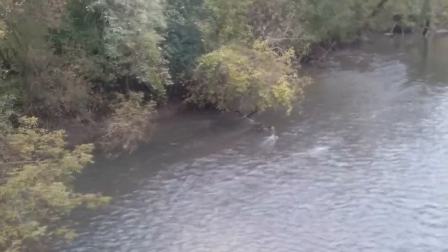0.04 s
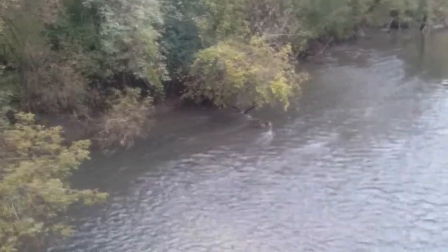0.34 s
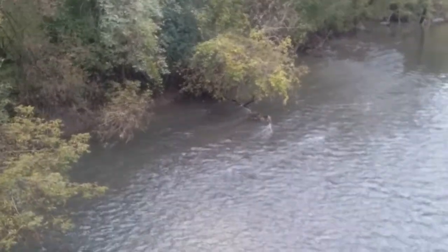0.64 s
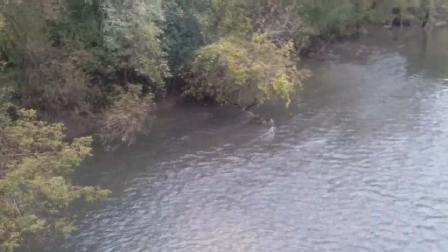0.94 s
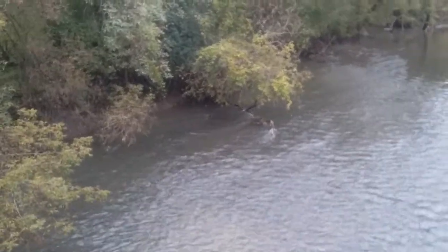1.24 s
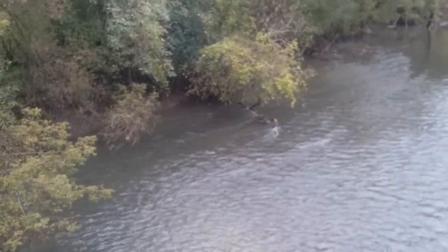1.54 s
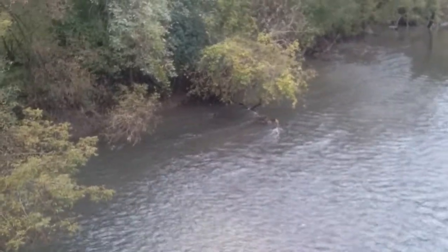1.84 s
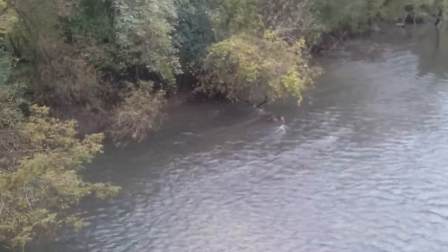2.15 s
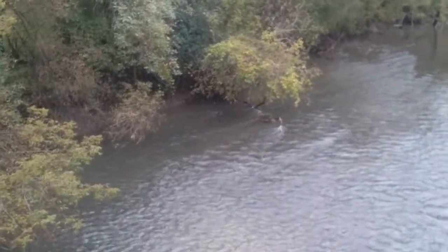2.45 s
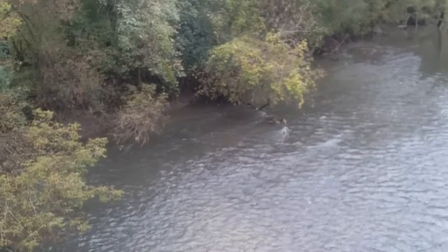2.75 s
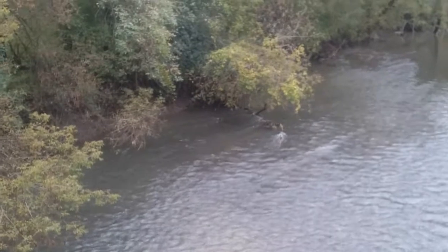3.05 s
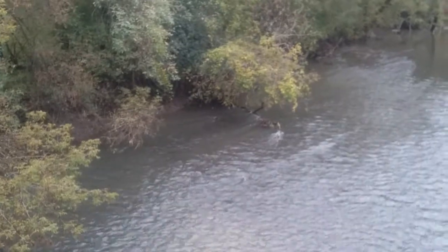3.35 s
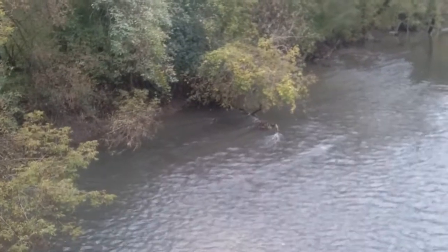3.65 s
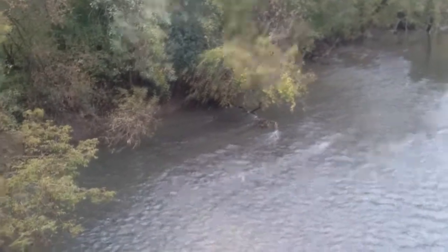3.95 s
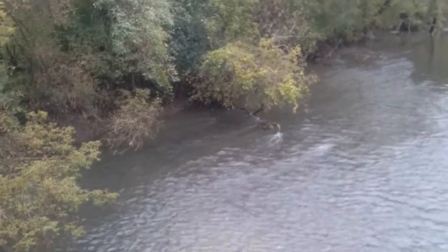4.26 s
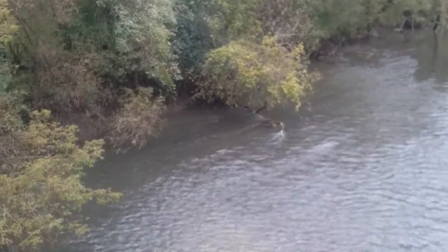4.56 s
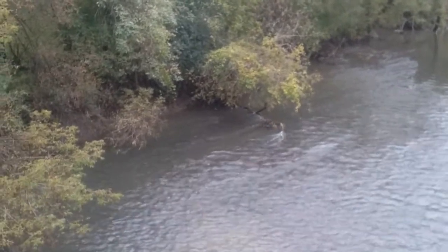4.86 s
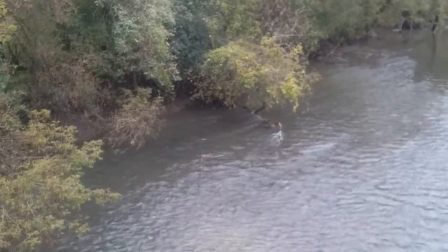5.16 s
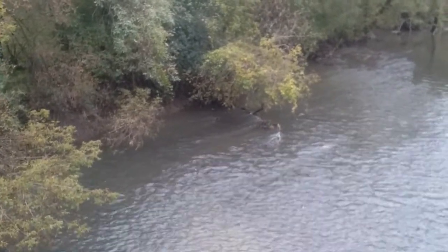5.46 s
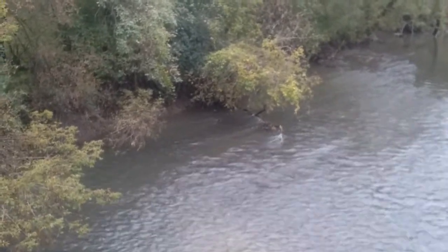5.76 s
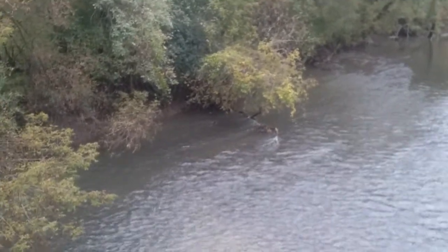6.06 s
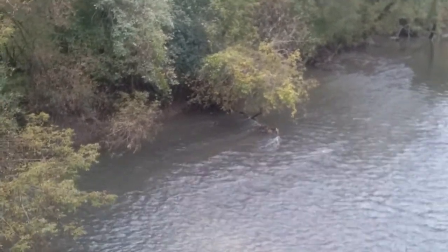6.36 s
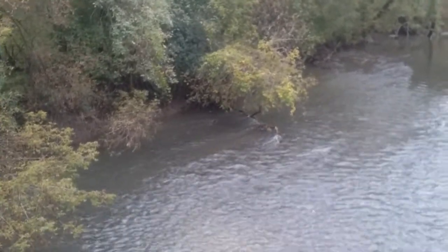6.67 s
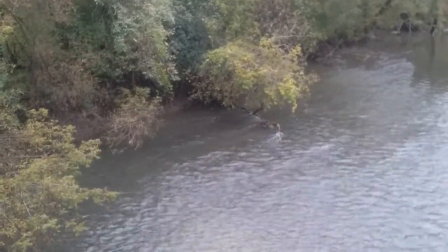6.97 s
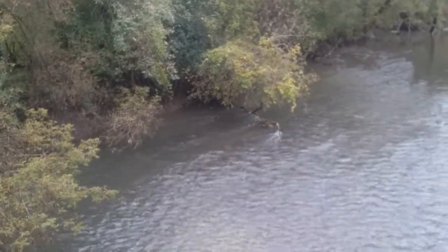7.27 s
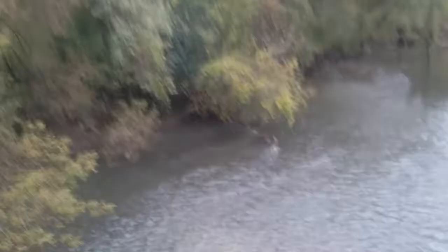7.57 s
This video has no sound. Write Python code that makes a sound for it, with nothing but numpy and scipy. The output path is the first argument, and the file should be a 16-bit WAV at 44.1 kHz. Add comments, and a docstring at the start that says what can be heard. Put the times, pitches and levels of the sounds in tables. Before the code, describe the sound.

Soft rushing water and low outdoor rumble run under close handling thumps, ending with a finger rub and a sharp button snap.

```python
"""On a wooded bank above a broad river, with the microphone in a hand-held camera.
From the start the water is a quiet, even rush over a low outdoor rumble. Leaves stir, drops fall
and a few bird notes come from far off; close up, the hand shifts and bumps the case now and then.
At the end, right at the microphone, a finger rubs the case, snaps a button and stutters off it."""
import sys
import numpy as np
from scipy import signal
from scipy.fft import rfft, irfft, next_fast_len
from scipy.io import wavfile
from scipy.ndimage import uniform_filter1d, map_coordinates

SR = 44100
rng = np.random.default_rng(int(sys.argv[2]) if len(sys.argv) > 2 else 0)


def store_wav(level_fs):
    """Save 16-bit WAV to argv[1]."""
    pcm = np.round(np.clip(np.atleast_2d(level_fs), -1, 1) * 32767)
    wavfile.write(sys.argv[1], SR, pcm.T.astype(np.int16))


N = 344421

# The strength of the river as heard from the bank. Each row: time in seconds, strength in dB.
RIVER_STRENGTH = [(0.0, -53), (0.17, -52.5), (0.33, -53.5), (0.52, -51.5), (0.72, -49), (1.2, -52.5),
                  (1.3, -53.5), (1.41, -53.5), (1.53, -52.5), (1.72, -55), (1.9, -53), (2.48, -56),
                  (2.64, -52.5), (2.87, -54.5), (3.52, -54), (3.57, -57), (3.8, -54.5), (4.05, -52),
                  (4.45, -54.5), (4.82, -52.5), (5.15, -54), (5.42, -54), (5.63, -52), (5.88, -52),
                  (6.4, -54), (6.97, -53), (7.5, -54)]


def amp(db):
    """Decibels to gain."""
    return 10 ** (np.asarray(db) / 20)


def unit(x):
    """Scale to rms 1."""
    return x / np.sqrt(np.mean(x ** 2) + 1e-20)


def along(points, hz):
    """Read (Hz, value) points on a log frequency axis."""
    freqs, values = np.transpose(points)
    return np.interp(np.log(hz + 1), np.log(freqs + 1), values)


def curve(rows):
    """Join (seconds, value) rows into one value per sample."""
    return np.interp(np.arange(N) / SR, *np.transpose(rows))


def wobble(per_second):
    """A smooth curve through so many random knots a second."""
    knots = rng.standard_normal(int(N * per_second / SR) + 4)
    return map_coordinates(knots, [np.arange(N) * per_second / SR])


def swell(start, length):
    """A rounded rise and fall, timed in seconds."""
    return np.sin(np.pi * np.clip((np.arange(N) / SR - start) / length, 0, 1))


def add(track, start, sound):
    """Mix a sound into the track from a start in seconds."""
    span = track[round(start * SR):][:len(sound)]
    span += sound[:len(span)]


def filtered(x, response):
    """Filter x by a gain given as a function of Hz."""
    size = next_fast_len(N + SR // 2)
    return irfft(rfft(x, size) * response(np.fft.rfftfreq(size, 1 / SR)), size)[:N]


def coloured(x, spectrum):
    """Shape x by (Hz, dB) points, at rms 1."""
    return unit(filtered(x, lambda hz: amp(along(spectrum, hz))))


def patchy(depth_db, size=512):
    """White noise whose strength drifts in patches of time and frequency."""
    cells = signal.stft(rng.standard_normal(N), nperseg=size)[2]
    drift = uniform_filter1d(rng.standard_normal(cells.shape), size=5, axis=0)
    drift = uniform_filter1d(drift, size=14, axis=1)
    return signal.istft(cells * amp(depth_db * unit(drift)), nperseg=size)[1][:N]


def far_tones(rows, width_hz):
    """Short pitched sounds, blurred by distance into narrow bands of noise."""
    out = np.zeros(N)
    for start, length, pitch, db in rows:
        band = filtered(rng.standard_normal(N), lambda hz: np.exp(-((hz - pitch) / width_hz) ** 2))
        out += amp(db) * swell(start, length) * unit(band)
    return out


def blow(spectrum, soft_hz, low_hz=0, size=8192):
    """A pulse of peak 1: a soft touch dulls it above soft_hz, a light one thins it below low_hz."""
    hz = np.fft.rfftfreq(size, 1 / SR)
    touch = (1 + (hz / soft_hz) ** 2) * (1 + (low_hz / (hz + 1)) ** 2)
    cepstrum = irfft(np.log(amp(along(spectrum, hz)) / touch))
    causal_fold = np.r_[1, np.full(size // 2 - 1, 2), np.zeros(size // 2)]
    pulse = irfft(np.exp(rfft(cepstrum * causal_fold)))
    return pulse / np.abs(pulse).max()


def contacts(rows, body_spectrum):
    """Each contact pushes the case and adds a bright plastic tick."""
    # The tick. Each row: frequency in Hz, level in dB.
    tick_spectrum = [(200, -53), (1000, -22), (4500, 5), (5700, -11), (7000, 3.5), (8000, 1), (9500, 3),
                     (12000, -5.5), (16000, -10)]
    out, tick = np.zeros(N), blow(tick_spectrum, soft_hz=np.inf)
    for start, body_db, tick_db, *touch in rows:
        add(out, start, amp(body_db) * blow(body_spectrum, *touch))
        add(out, start - 0.0003, -amp(tick_db) * tick)  # the surface is touched before the case gives
    return out


def river():
    """Below the bank, countless ripples merge into one rush that surges a little."""
    # The rush. Each row: frequency in Hz, level in dB.
    rush_spectrum = [(100, -24), (260, -6.5), (420, 1.5), (500, -3.5), (800, -1), (1200, -6.5), (2300, -8),
                     (2800, -12), (3800, -11), (4400, -17), (5100, -28), (7000, -31), (15000, -29.5)]
    # Narrow bands that stand out of it. Each row: centre in Hz, width in Hz, lift in dB.
    bands = [(827, 31, 0.5), (1038, 11, 7), (1425, 66, 5), (1807, 31, 3.5)]

    def band_gain(hz):
        return amp(sum(db / (1 + (2 * (hz - centre) / width) ** 2) for centre, width, db in bands))

    ripples = filtered(patchy(depth_db=0.78), band_gain)
    level_db = curve(RIVER_STRENGTH) + 0.8
    surge_db = 0.79 * wobble(per_second=30) + 0.35 * wobble(per_second=5.4)
    return amp(level_db + surge_db) * coloured(ripples, rush_spectrum)


def lapping(per_second, fade_s):
    """Wavelets slap the bank at random: brief, dull splashes that overlap."""
    # A splash. Each row: frequency in Hz, level in dB.
    splash_spectrum = [(60, -44), (150, -19), (300, 0.5), (800, -1), (1500, -3.5), (3500, -10), (5000, -20),
                       (12000, -49)]
    slaps = rng.random(N) * (rng.random(N) < per_second / SR)
    t = np.arange(SR // 4) / SR
    envelope = signal.fftconvolve(slaps, t / fade_s * np.exp(1 - t / fade_s))[:N]
    splashes = unit(envelope * coloured(rng.standard_normal(N), splash_spectrum))
    return amp(curve(RIVER_STRENGTH) - 5.5) * splashes


def gurgles():
    """The water gives soft, low plops some way off."""
    # Each row: start in seconds, length in seconds, pitch in Hz, level in dB.
    plops = [(2.60, 0.11, 378, -50), (5.34, .06, 524, -53.5)]
    return far_tones(plops, width_hz=130)


def drips():
    """Each drop traps a bubble that rings briefly and rises a little in pitch."""
    # Each row: start in seconds, pitch in Hz, peak in dB.
    drops = [(.756, 1840, -44), (2.217, 3570, -48), (6.087, 526, -36), (6.872, 2260, -49)]
    fade_s, relative_rise_per_s = 0.0016, 2.8
    out, t = np.zeros(N), np.arange(SR // 10) / SR
    envelope = t / fade_s * np.exp(1 - t / fade_s)
    for start, hz, db in drops:
        bubble = np.sin(2 * np.pi * hz * (t + relative_rise_per_s * t ** 2 / 2))
        add(out, start, amp(db) * envelope * bubble)
    return out


def bumps():
    """The hand knocks the case: a thud with a faint tick, then a brief, dense ring of the shell."""
    # Each row: start in seconds, thud peak in dB, bass corner in Hz, softness corner in Hz.
    knocks = [(.237, -31, 90, 450), (.265, -42, 60, 200), (0.609, -26.5, 150, 400), (0.634, -36, 60, 200),
              (.648, -41, 60, 200), (0.782, -37, 140, 400), (.805, -36.5, 110, 300), (1.019, -39, 120, 200),
              (1.915, -37.5, 40, 200), (3.894, -36, 150, 6000), (4.017, -36, 100, 170),
              (4.069, -10.5, 20, 7500), (4.115, -40, 170, 350), (4.571, -40, 120, 200),
              (4.78, -43, 120, 250), (5.472, -40.5, 100, 200), (5.748, -39.5, 110, 170),
              (5.998, -38, 110, 400), (6.056, -39, 130, 300), (6.278, -41, 110, 180), (6.44, -43, 100, 180),
              (6.503, -40.5, 110, 180), (6.569, -42, 110, 180), (6.643, -41.5, 100, 180),
              (7.108, -41, 150, 400), (7.234, -39, 140, 400), (7.387, -43, 150, 400),
              (7.6175, -33, 270, 350), (7.6276, -25.5, 350, 450), (7.634, -21.5, 320, 380),
              (7.6434, -26, 450, 450), (7.654, -30, 330, 380)]
    # The thud. Each row: frequency in Hz, level in dB.
    thud_spectrum = [(25, -40), (42, -21), (62, 1.5), (85, 3), (150, 4), (300, -1), (500, -6), (1150, -6.5),
                     (1600, -16), (2700, -16), (4500, -31.5), (8000, -50), (16000, -66)]
    tick_db, ring_db = -29, -17.5  # relative to the thud
    ring_fade_s, ring_low_hz = 0.02, 350
    rows = [(start, db, db + tick_db, soft_hz, low_hz) for start, db, low_hz, soft_hz in knocks]
    thuds = contacts(rows, thud_spectrum)
    t = np.arange(SR // 10) / SR
    tail = rng.standard_normal(len(t)) * np.exp(-t / ring_fade_s)
    tail = signal.sosfilt(signal.butter(2, ring_low_hz, "highpass", fs=SR, output="sos"), tail)
    ring = signal.fftconvolve(thuds, tail / np.linalg.norm(tail))[:N]
    return thuds + amp(ring_db) * ring


def rubbing():
    """Skin slides next to the microphone, shaking the case and scuffing it in fine grains."""
    # Each row: start in seconds, length in seconds, shudder level in dB, scuff level in dB.
    rubs = [(0.06, 0.18, -52, -60), (0.224, 0.052, -46, -50), (1.853, 0.12, -55, -63),
            (3.99, 0.32, -52.5, -55), (4.064, 0.04, -35.5, -48.5), (5.802, 0.1, -49, -52.5),
            (7.527, 0.22, -39, -48.5), (7.624, 0.034, -25.5, -38.5), (7.645, 0.2, -59.5, -43.5)]
    # The low shudder and the brighter scuff. Each row: frequency in Hz, level in dB.
    shudder_spectrum = [(30, -45), (50, -24), (66, 5), (90, 1.5), (125, 11), (175, -3), (280, -2),
                        (480, -8.5), (900, -19.5), (3000, -59)]
    scuff_spectrum = [(100, 3), (400, 1.5), (1400, 2.5), (3000, -4.5), (4500, -7), (5600, -18.5),
                      (9500, -18.5), (15000, -30)]
    shudder = coloured(rng.standard_normal(N), shudder_spectrum)
    grains = rng.standard_normal(N) * amp(3.1 * wobble(per_second=600))
    scuff = coloured(grains, scuff_spectrum)
    return sum(swell(start, length) ** 2 * (amp(shudder_db) * shudder + amp(scuff_db) * scuff)
               for start, length, shudder_db, scuff_db in rubs)


def sleeve():
    """Soft cloth brushes past the case in one dull sweep."""
    # The cloth. Each row: frequency in Hz, level in dB.
    cloth_spectrum = [(50, -4), (160, 17.5), (300, 3), (600, -2), (1500, 3.5), (3000, -3), (4400, -14),
                      (5400, -20), (8000, -23), (15500, -28)]
    cloth = coloured(rng.standard_normal(N), cloth_spectrum)
    return amp(-43.5) * swell(start=0.593, length=0.081) * cloth


def button():
    """The button squeaks, snaps home and gives a small click; a lone dull tick sounds at the end."""
    # Each row: start in seconds, body peak in dB, tick peak in dB, softness corner in Hz.
    clicks = [(7.6669, -23, -24, 3000), (7.6687, -18.5, -24, 3000), (7.671, 1.5, -19, 12000),
              (7.6897, -32, -34, 4000), (7.8063, -24, -55, 1400)]
    # The squeak and the snap. Each row: frequency in Hz, level in dB.
    squeak_spectrum = [(500, -11), (4500, -13), (6500, -30), (8000, -8), (9600, 1), (11000, -10),
                       (13000, -22), (15000, -32)]
    snap_spectrum = [(100, -60), (300, -12), (600, 1), (1400, -5.5), (2300, -4), (3300, 1), (4800, -1),
                     (5400, -13.5), (6500, -4.5), (7800, -17), (15000, -25)]
    friction = coloured(rng.standard_normal(N), squeak_spectrum)
    squeak = amp(-18.5) * swell(start=7.6657, length=0.0073) ** 2 * friction
    return squeak + contacts(clicks, snap_spectrum)


def finger_stutter():
    """The finger sticks and slips as it leaves the case: crisp knocks that spread out and grow."""
    # Each row: start in seconds, thud peak in dB, tick peak in dB.
    slips = [(7.7005, -24.5, -28), (7.7137, -21, -24), (7.7289, -21.5, -20.5), (7.7448, -20, -16),
             (7.7639, -18.5, -25)]
    # The thud of a slip. Each row: frequency in Hz, level in dB.
    slip_spectrum = [(30, -42), (80, -7), (130, 4), (220, 3), (330, 1), (500, -6.5), (950, -4), (1700, -17),
                     (2800, -18.5), (4500, -20), (8000, -47), (16000, -66)]
    soft_hz = 6500
    return contacts([(*slip, soft_hz) for slip in slips], slip_spectrum)


def leaves():
    """Leaves on the bank stir in soft swells, with a thin sizzle on top."""
    # Each row: start in seconds, length in seconds, level in dB.
    stirs = [(0.03, 0.19, -54), (1.26, 0.082, -53), (1.43, 0.25, -56.5), (1.858, 0.088, -54.5),
             (2.573, .14, -57.5), (4.76, 0.094, -57.5), (5.538, 0.13, -57.5), (5.72, 0.32, -59)]
    # The rustle. Each row: frequency in Hz, level in dB.
    leaf_spectrum = [(150, -9), (600, 6), (1500, 4), (3000, -3), (4400, -5.5), (5400, -17), (8000, -22),
                     (13000, -19), (15500, -21)]
    rustle = coloured(patchy(depth_db=3.5), leaf_spectrum)
    return rustle * sum(amp(db) * swell(start, length) for start, length, db in stirs)


def birds():
    """A few faint, high notes reach the microphone from far off."""
    # Each row: start in seconds, length in seconds, pitch in Hz, level in dB.
    notes = [(1.26, .28, 6150, -81), (1.38, 0.34, 3400, -68), (5.65, .11, 6200, -77.5),
             (5.67, 0.14, 3400, -62), (5.84, 0.23, 3060, -72)]
    return far_tones(notes, width_hz=180)


def rumble():
    """The low, uneven murmur of open air swells and sinks with the rush."""
    # The murmur. Each row: frequency in Hz, level in dB.
    air_spectrum = [(20, -32), (33, -29), (45, -17), (56, -11), (67, 2), (85, -2.5), (115, 0.5), (170, 0.5),
                    (215, -4), (300, -10), (600, -40)]
    river_db = curve(RIVER_STRENGTH)
    level_db = -54 + (river_db - river_db.mean()) + 1.1 * wobble(per_second=13)
    return amp(level_db) * coloured(rng.standard_normal(N), air_spectrum)


def scene():
    """The river bank in mono, with the hand close to the microphone."""
    water = river() + lapping(per_second=260, fade_s=0.0031) + gurgles() + drips()
    outdoors = water + rumble() + leaves() + birds()
    hand = bumps() + rubbing() + sleeve() + button() + finger_stutter()
    return (outdoors + hand)[None]


def record(dry):
    """The camera cuts the deepest bass, adds its own hiss and keeps nothing above its band limit."""
    # The hiss. Each row: frequency in Hz, level in dB.
    hiss_spectrum = [(100, 6), (5000, -2), (9000, 0), (15500, 1)]
    low_cut_hz, top_hz = 42, 15850
    sound = signal.sosfilt(signal.butter(2, low_cut_hz, "highpass", fs=SR, output="sos"), dry[0])
    hiss = amp(-69.0) * coloured(rng.standard_normal(N), hiss_spectrum)
    return filtered(sound + hiss, lambda hz: np.clip((top_hz - hz) / 100, 0, 1))[None]


dry = scene()
out = record(dry)
store_wav(out)
```